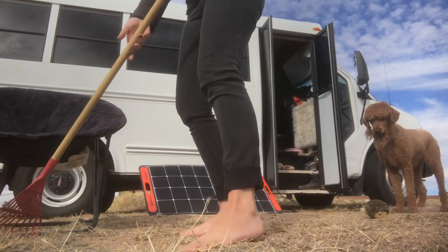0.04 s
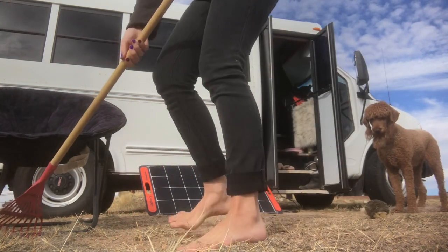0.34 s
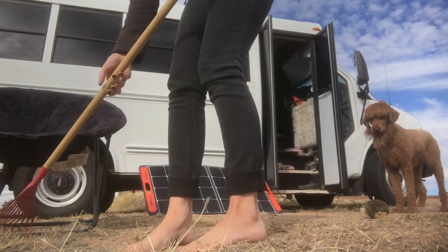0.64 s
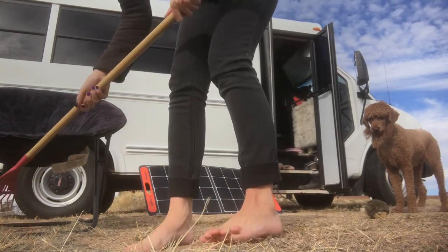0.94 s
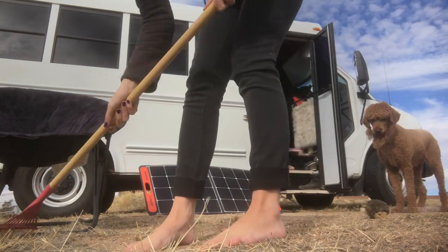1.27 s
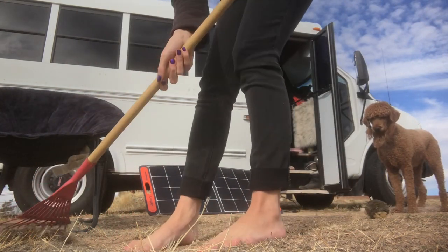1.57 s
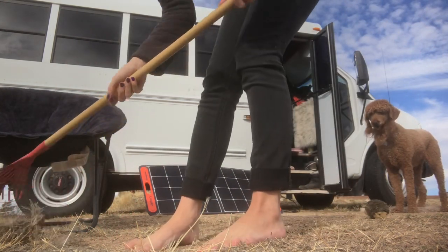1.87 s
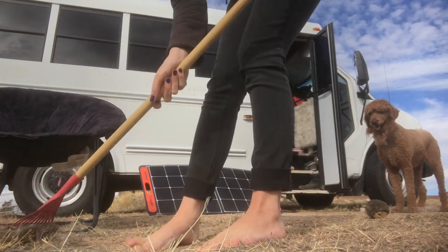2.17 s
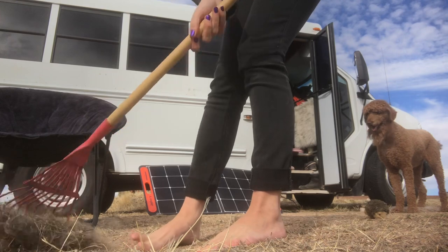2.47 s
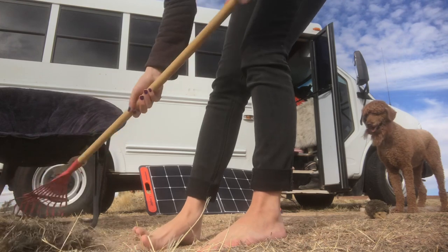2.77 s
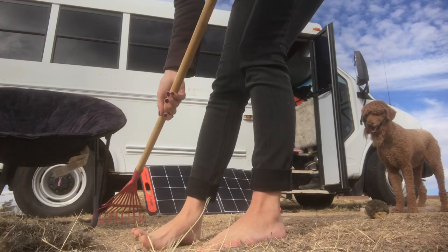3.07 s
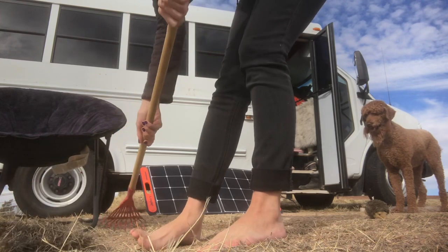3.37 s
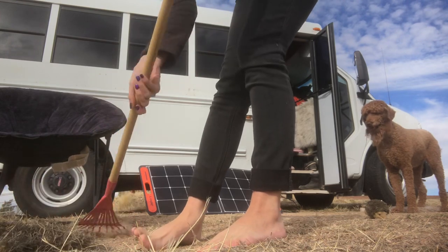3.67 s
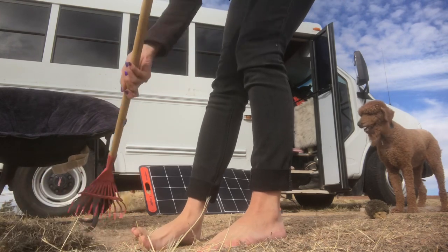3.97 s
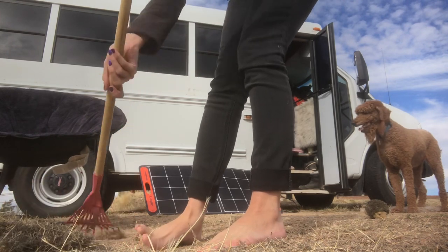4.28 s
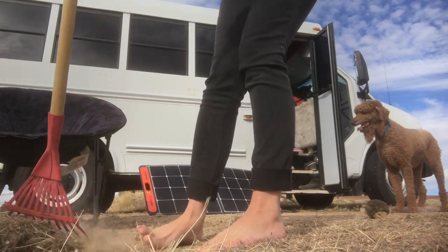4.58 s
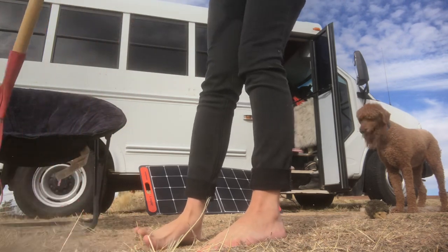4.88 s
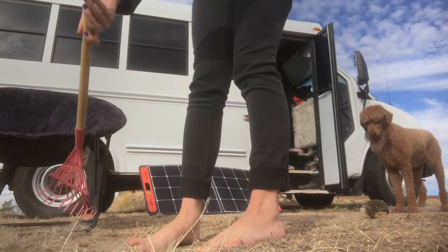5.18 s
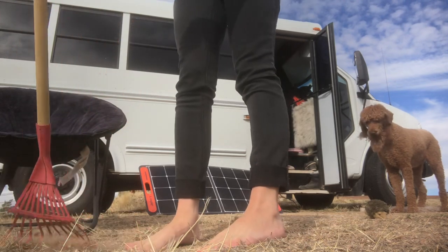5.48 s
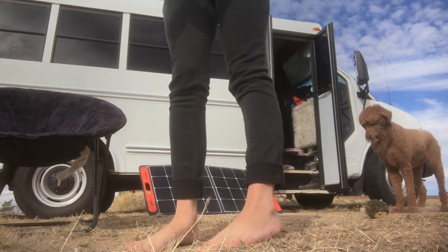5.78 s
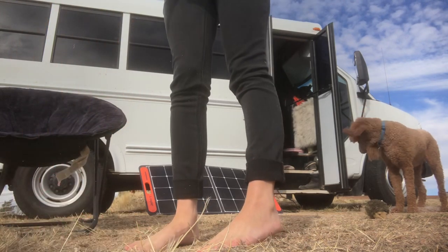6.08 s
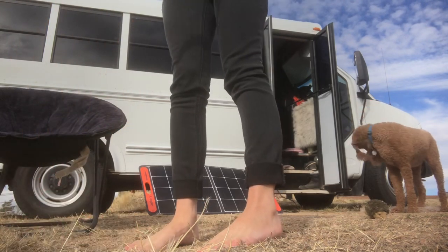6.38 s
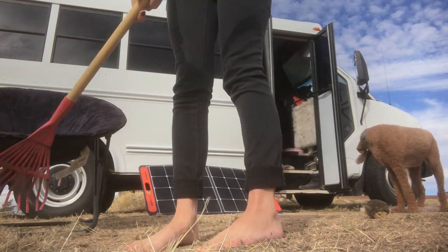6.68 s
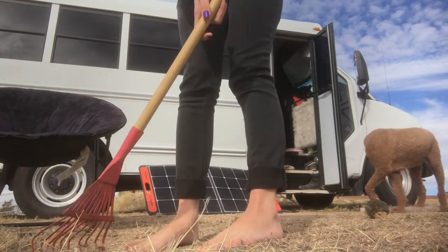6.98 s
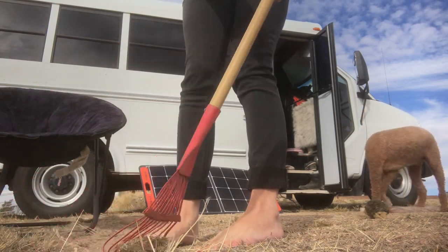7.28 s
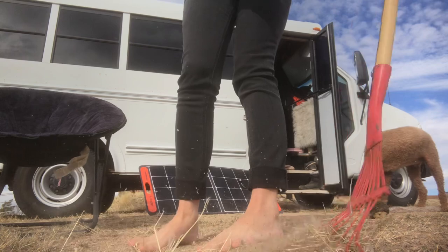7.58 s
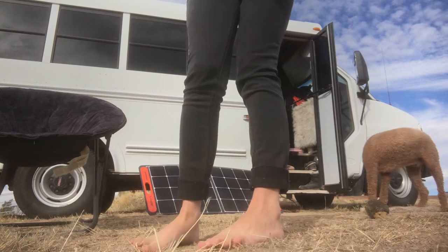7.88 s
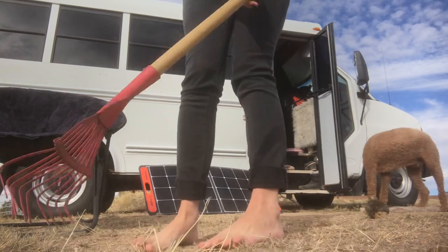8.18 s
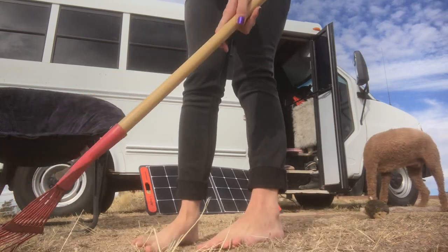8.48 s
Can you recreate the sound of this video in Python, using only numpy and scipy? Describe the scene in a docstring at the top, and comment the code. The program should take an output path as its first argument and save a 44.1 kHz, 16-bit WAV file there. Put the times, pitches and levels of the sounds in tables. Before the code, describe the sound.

Close, uneven strokes of a leaf rake drag through dry straw in a quiet yard, tines flicking and stalks snapping.

```python
"""A small plastic leaf rake, close to the microphone, is pulled again and again through dry grass and
straw in an open yard. Its tines catch, slip and spring free, stalks crackle and snap, and the fan rings
briefly. It works through loose straw, then at the heap, then on short stubble, where one tine judders.
A breeze bumps the low microphone; far off, a dog woofs three times over a faint drone."""
import sys
import numpy as np
from scipy import signal
from scipy.fft import rfft, irfft
from scipy.io import wavfile
from scipy.ndimage import uniform_filter1d

SR = 44100
rng = np.random.default_rng(int(sys.argv[2]) if len(sys.argv) > 2 else 0)


def wrap_up_sound(samples):
    """Save the sound to the file named by the first command line argument, as 16-bit audio."""
    columns = np.atleast_2d(samples).T
    # keep every value between -1 and 1, then stretch to whole-number steps
    tamed = np.clip(columns, -1, 1)
    steps = np.round(tamed * 32767).astype(np.int16)
    wavfile.write(sys.argv[1], SR, steps)


N = 381024
TIME = np.arange(N) / SR
SHORT_TIME = TIME[:SR // 4]
FREQS = np.maximum(np.fft.rfftfreq(N, 1 / SR), 1)
FIRM_PULL_DB = -43   # scrape level of a firm pull; force_db is counted from here


def from_db(db):
    """Decibels to gain."""
    return 10 ** (np.asarray(db) / 20)


def rms_one(x):
    """Scale to unit power."""
    return x / np.sqrt(np.mean(x ** 2) + 1e-20)


def drift(per_s):
    """A random wander of unit power with about per_s turns a second."""
    return rms_one(np.interp(TIME * per_s, np.arange(4096), rng.standard_normal(4096)))


def hump(middle_s, half_s):
    """Gain of a smooth rise and fall."""
    return np.exp(-np.minimum(((TIME - middle_s) / half_s) ** 2, 40))


def dying(t60):
    """A quarter second of decay, falling 60 dB in t60 seconds."""
    return from_db(-60 * SHORT_TIME / t60)


def band(x, low_hz, high_hz, order=3):
    """Causal band-pass."""
    return signal.sosfilt(signal.butter(order, [low_hz, high_hz], "band", fs=SR, output="sos"), x + 1e-18)


def colour(x, spectrum, resonances=()):
    """Minimum-phase filter: a smooth spectrum with resonances standing on it."""
    hz, db = np.transpose(spectrum)
    shape_db = np.interp(np.log(FREQS), np.log(hz), db)
    for centre, width, lift in resonances:
        shape_db = shape_db + lift / (1 + (2 * (FREQS - centre) / width) ** 2)
    cepstrum = irfft(np.log(from_db(shape_db)), N)
    cepstrum[1:N // 2] *= 2
    cepstrum[N // 2 + 1:] = 0
    return irfft(rfft(x) * np.exp(rfft(cepstrum)), N)


def add(out, start, sound):
    """Mix a short sound in at start seconds."""
    at = round(start * SR)
    out[at:at + len(sound)] += sound[:max(N - at, 0)]


def clicks_at(per_s, spread_db):
    """Random clicks of uneven size, with the same power at any rate."""
    at = np.flatnonzero(rng.random(N) < per_s / SR)
    out = np.zeros(N)
    out[at] = from_db(spread_db * np.minimum(rng.exponential(1, N)[at], 4))
    out[at] *= np.sign(rng.random(N)[at] - .5)
    return out / np.sqrt(per_s)


def ring(clicks, hz, t60):
    """Each click sets a dying sine ringing."""
    radius, angle = from_db(-60 / (t60 * SR)), 2 * np.pi * hz / SR
    return signal.lfilter([0, np.sin(angle)], [1, -2 * radius * np.cos(angle), radius ** 2], clicks + 1e-18)


# Wind on the microphone. Each row: frequency in Hz, spectrum level in dB.
WIND_SPECTRUM = [(12, -46), (20, -20.5), (49, 4), (107, -3), (135, -3.5), (248, -16.5), (375, -40.5),
                 (409, -44), (513, -16.5), (600, -27), (780, -65), (1320, -120)]
# Gusts. Each row: middle in seconds, half length in seconds, level in dB.
WIND_GUSTS = [(0.35, 0.45, -56.5), (1.25, .2, -60), (2.15, 0.21, -59), (3.1, .42, -56), (7.2, 0.18, -61.5),
              (8.6, 0.092, -63)]

def breeze(lull_db=-63.5, lumps_db=2.6):
    """Lumpy wind rumbles on the microphone, low over the ground."""
    blowing = from_db(lull_db) + sum(from_db(db) * hump(middle, half) for middle, half, db in WIND_GUSTS)
    lumps = from_db(lumps_db * drift(22))
    wind = colour(rng.standard_normal(N), WIND_SPECTRUM)
    return blowing * rms_one(band(wind, 41, 386) * lumps)


# The open air. Each row: frequency in Hz, spectrum level in dB.
AIR_SPECTRUM = [(15, -28.5), (25, -11.5), (53, -6.5), (80, -11), (130, -10.5), (575, -22), (641, -22.5),
                (796, -26.5), (2410, -31.5), (3250, -35), (6210, -36.5), (14000, -45.5), (16000, -64)]

def yard(drone_db=-64.5, air_db=-71.5):
    """A low drone in the distance and faint, even air all round."""
    drone = rms_one(band(rng.standard_normal(N), 66.5, 87, order=2))
    air = colour(rng.standard_normal(N), AIR_SPECTRUM)
    air /= np.std(band(air, 300, 15000))
    return from_db(drone_db) * drone + from_db(air_db) * air


def thud(db, hz, t60, swell_t60=.0099):
    """A low tone that swells and dies."""
    return from_db(db) * np.sin(2 * np.pi * hz * SHORT_TIME) * dying(t60) * (1 - dying(swell_t60))


# Steps, gusts and dull knocks of the rake as it lands. Each row: start in seconds, level in dB, pitch in Hz.
DULL_BUMPS = [(0.018, -37.5, 151), (0.040, -40, 70.6), (0.071, -35, 140), (0.251, -37.5, 180),
              (0.272, -42, 67), (0.466, -30, 197), (0.491, -42, 92), (0.658, -39, 111), (1.05, -40, 100),
              (2.056, -37.5, 132), (2.503, -38, 75), (2.543, -42.5, 183), (2.698, -34, 149),
              (2.753, -37.5, 70), (3.249, -42, 84.4), (3.38, -37, 90), (4.649, -42, 65),
              (8.141, -43.5, 114)]

def bumps(cycles=7.2):
    """Steps, gusts and the landing rake reach the microphone as soft pushes, a few low cycles each."""
    out = np.zeros(N)
    for start, db, hz in DULL_BUMPS:
        add(out, start, thud(db, hz, t60=cycles / hz))
    return out


def grains(clicks, t60, sharp, turns_db=5, count=5):
    """Several tines or stalks take the load in turn, and each rattles in its own way."""
    shares = np.array([from_db(turns_db * drift(18)) for _ in range(count)])
    shares /= np.sqrt(np.mean(shares ** 2, axis=0))
    owner = rng.integers(0, count, N)
    out = sharp * clicks
    for k, share in enumerate(shares):
        rattle = rng.standard_normal(len(SHORT_TIME)) * dying(t60)
        rattle = rattle[:SR // 16] / np.linalg.norm(rattle)
        out += signal.oaconvolve(clicks * share * (owner == k), rattle)[:N]
    return out


def pings(per_s, low_hz, high_hz, cycles, spread_db):
    """Plucked stalks and tine tips, each at its own pitch, fall 60 dB over the given cycles."""
    out, t = np.zeros(N), TIME[:SR // 16]
    for when, pitch, size in rng.random((int(per_s * TIME[-1]), 3)):
        hz = low_hz * (high_hz / low_hz) ** pitch
        ping = np.sin(2 * np.pi * hz * t) * from_db(-60 * t * hz / cycles)
        add(out, when * TIME[-1], from_db(spread_db * size) * ping)
    return rms_one(out)


def contacts(force_db):
    """Tines stick and slip and crush straw; a harder pull makes more slips and plucks the tines harder."""
    effort = from_db(.25 * np.maximum(force_db, -20))
    slips = rms_one(grains(clicks_at(1600 * effort, spread_db=2), t60=.035, sharp=.51))
    crackle = rms_one(grains(clicks_at(900 * effort, spread_db=2), t60=.044, sharp=.45))
    splinters = grains(clicks_at(110 * effort, spread_db=3.5), t60=.0099, sharp=.63, turns_db=.5, count=2)
    splinters = rms_one(band(splinters, 5100, 19000, order=1))
    tine_rings = effort * pings(per_s=150, low_hz=1099.6, high_hz=3422, cycles=113, spread_db=11.5)
    stalk_rings = pings(per_s=380, low_hz=3300, high_hz=14000, cycles=330, spread_db=16)
    tines = slips + from_db(-14) * tine_rings
    straw = crackle + .86 * slips + from_db(-7) * stalk_rings + from_db(-6) * splinters
    tufts = from_db(.9 * drift(38))   # the whole fan jerks over tufts
    return tufts * np.array([tines, straw])


def band_gains(scrape_db, rumble_db, straw_db):
    """A column of gains for rumble, scrape and straw; rumble and straw are relative to the scrape."""
    return from_db([[scrape_db + rumble_db], [scrape_db], [scrape_db + straw_db]])


# Rustles. Each row: ground, middle and half length in seconds, scrape in dB, straw over scrape in dB.
STRAW_RUSTLES = [("loose", 0.07, .04, -73, -7), ("loose", 0.263, .025, -72, -4),
                 ("loose", 0.523, 0.12, -68.5, -5.5), ("loose", 1.028, 0.027, -64, -4.5),
                 ("loose", 1.745, .02, -70, 0), ("loose", 2.52, .06, -65.5, -9),
                 ("heap", 3.36, 0.013, -67, -12), ("heap", 3.87, 0.084, -66.5, -1),
                 ("heap", 4.02, 0.13, -66.5, -4), ("heap", 4.555, .03, -52, 4),
                 ("heap", 4.78, 0.099, -70, -7), ("heap", 4.945, 0.07, -61.5, -5.5),
                 ("stubble", 5.27, .035, -73, -10), ("stubble", 5.885, .015, -54, 0),
                 ("stubble", 6.07, 0.11, -70, 0), ("stubble", 6.325, 0.062, -70.5, 2),
                 ("stubble", 7.11, .03, -58, 2), ("stubble", 7.69, .035, -59, 4.7),
                 ("stubble", 7.78, 0.12, -69.5, 4.5), ("stubble", 7.95, 0.086, -65.5, -6.5)]

def rustle_power(ground, rumble_db=-6.5):
    """Lifted straw shifts and settles: power in the three bands."""
    return sum((band_gains(db, rumble_db, straw_db) * hump(middle, half)) ** 2
               for on, middle, half, db, straw_db in STRAW_RUSTLES if on == ground)


# Modes of the unloaded fan. Each row: frequency in Hz, level in dB, t60 in seconds.
FAN_MODES = [(1420, 0, .04), (1915, 1, .035), (2900, 2, .03), (3470, 1, .035), (4060, 0, .03),
             (4700, -5, .035), (5550, -2, .025), (7120, -5, .03)]

def free_fan(force_db, relative_db=-14.5, follows=.68):
    """Straw tickles the tines; the ground damps them, so their ringing stands out at a light touch."""
    song = sum(from_db(db) * ring(clicks_at(150, spread_db=2.5), hz, t60) for hz, db, t60 in FAN_MODES)
    return from_db(FIRM_PULL_DB + relative_db + follows * force_db) * rms_one(song)


# Breaking stalks. Each row: start in seconds, relative level in dB, top of the band in Hz.
STALK_SNAPS = [(0.491, -44.5, 14000), (0.507, -45, 14000), (0.812, -40, 9000), (0.853, -42, 12000),
               (1.6836, -41, 13000), (2.499, -47.5, 13000), (5.982, -39.5, 8940), (6.1737, -40, 7000),
               (6.373, -47, 3000), (6.688, -52, 7000), (7.722, -36, 14800), (7.8534, -37, 10000)]

def snaps(gain_db=7, tail_db=-9, tail_t60=.0087):
    """A dry stalk breaks close by, with one sharp click and a very short splintering tail."""
    out = np.zeros(N)
    for start, db, top_hz in STALK_SNAPS:
        crack = from_db(tail_db) * rng.standard_normal(len(SHORT_TIME)) * dying(tail_t60)
        crack[0] = 1
        tick = band(crack, 400, top_hz, order=1)
        add(out, start, from_db(db + gain_db) * tick / np.linalg.norm(tick))
    return out


# Pulls of the rake. Each row: ground, then start, swell, hold and release t60 in seconds, then scrape
# level, change over the hold, rumble over scrape and straw over scrape in dB.
RAKE_PULLS = [("loose", 0.587, 0.038, .18, .85, -58.5, -2.1, -4.5, -3.5),
              ("loose", 1.125, .10, .07, 0.35, -42, 2.45, -9.5, -4.5),
              ("loose", 1.346, 0.092, 0.081, 0.41, -46.5, -2, -5.5, -1.6),
              ("loose", 2.089, 0.058, 0.088, 0.48, -39.7, -2, -5.5, -4),
              ("heap", 3.385, .125, .275, .12, -40.5, -2, -10.5, -5.5),
              ("heap", 4.1496, 0.14, .19, 0.58, -39, 1.34, -9, -4),
              ("stubble", 5.295, 0.083, .21, 0.38, -42.3, -2.8, -7, -4),
              ("stubble", 5.62, 0.052, 0.16, 0.7, -46, -3.5, -4.5, -3),
              ("stubble", 6.915, 0.051, .025, .15, -51, 0, -3.5, -3),
              ("stubble", 7.05, .16, .09, .26, -45.8, -1.1, -3.5, -2),
              ("stubble", 7.295, 0.094, .135, .33, -48.8, 1.6, 1.8, -3),
              ("stubble", 7.555, .05, .025, 0.41, -50.5, 0, 1.6, -2),
              ("stubble", 8.415, 0.049, .175, .4, -47.5, 5.1, -1.7, -4)]

def pull_power(ground, swell_curve=1.12, rumble_follows=.82):
    """The tines dig in, drag at a nearly even force and lift out: power in the three bands."""
    power = np.zeros((3, N))
    for on, start, swell, hold, t60, db, change_db, rumble_db, straw_db in RAKE_PULLS:
        if on == ground:
            t = TIME - start
            dug_in = np.clip(t / swell, 0, 1) ** swell_curve
            held = np.clip((t - swell) / hold, 0, 1)
            released = np.clip((t - swell - hold) / t60, 0, 3)
            gain = dug_in * from_db(change_db * held - 60 * released)
            power += (band_gains(db, rumble_db, straw_db) * [gain ** rumble_follows, gain, gain]) ** 2
    return power


# Landings of the fan. Each row: ground, start in seconds, scrape level in dB, t60 in seconds.
FAN_LANDINGS = [("loose", 0.598, -56, 0.22), ("loose", 1.062, -46.5, 0.48), ("loose", 1.998, -52, .4),
                ("loose", 2.022, -47.5, 0.58), ("heap", 3.37, -55, .5), ("heap", 4.092, -46.5, 0.48),
                ("stubble", 5.302, -47, .5), ("stubble", 6.912, -56, .5), ("stubble", 7.066, -60, .6),
                ("stubble", 8.418, -56, 0.54)]

def landing_power(ground, attack_s=.007):
    """The fan lands and beds into the straw: power in the three bands."""
    power = np.zeros((3, N))
    for on, start, db, t60 in FAN_LANDINGS:
        if on == ground:
            t = TIME - start
            gain = np.clip(t / attack_s, 0, 1) * from_db(-60 * np.clip(t / t60, 0, 2))
            power += (band_gains(db, rumble_db=-7.5, straw_db=-2.5) * gain) ** 2
    return power


# The scrape in loose straw, at the heap and on stubble. Each row: frequency in Hz, spectrum level in dB.
LOOSE_SPECTRUM = [(120, -44), (200, -5.5), (278, -0.5), (612, -0.5), (763, -17.5), (867, -13), (1000, -8.5),
                  (1210, -11), (2330, -1.5), (3760, -9.5), (4680, -5), (5840, -16.5), (7010, -21),
                  (12600, -16), (16000, -25)]
HEAP_SPECTRUM = [(100, 0), (170, 1.5), (279, 7.5), (631, 5.5), (996, -5.5), (1210, -8), (1400, -2),
                 (2530, 3), (3700, -5), (4650, -6), (5950, -9.5), (7060, -8.5), (8380, -15), (12700, -14.5),
                 (16000, -19)]
STUBBLE_SPECTRUM = [(100, -57), (170, -13.5), (279, -0.5), (331, -2.5), (532, -1.5), (1180, -4.5),
                    (1490, -0.5), (1760, -3.5), (2580, -1), (3360, -10.5), (5520, -9.5), (7340, -17.5),
                    (8540, -18), (11800, -13.5), (16000, -19)]
# Fan resonances, which shift with the bend of the tines. Each row: centre and width in Hz, lift in dB.
LOOSE_RESONANCES = [(770, 104, 19), (1046, 45, 2.5), (1410, 94, 2), (1893, 85, 3), (2350, 290, 0.5),
                    (3550, 150, 5), (4050, 62, 3), (4650, 120, -3), (7160, 1600, 10.5)]
HEAP_RESONANCES = [(480, 90, 4.9), (730, 100, 7.1), (1042, 220, 8.9), (1385, 114, 7.6), (2520, 640, 2),
                   (4170, 98, 3.7), (4750, 220, 3.1), (7070, 570, 2.4), (7700, 470, 5.5)]
STUBBLE_RESONANCES = [(281, 41, 2.3), (530, 66, 4.3), (1576, 160, 3.1), (2070, 460, 3.9), (2500, 140, 1.7),
                      (4620, 650, 4), (5420, 190, 3), (7200, 1500, 6.6), (12000, 590, 4)]

def raking(contact, gains):
    """The contacts sound through each ground and the fan: low rumble, tine scrape, straw on top."""
    out = np.zeros(N)
    for ground, spectrum, resonances in [("loose", LOOSE_SPECTRUM, LOOSE_RESONANCES),
                                         ("heap", HEAP_SPECTRUM, HEAP_RESONANCES),
                                         ("stubble", STUBBLE_SPECTRUM, STUBBLE_RESONANCES)]:
        slips, crackle = colour(contact, spectrum, resonances)
        rumble = rms_one(band(slips, 177, 785))
        scrape = rms_one(band(slips, 845, 3220, order=5))
        straw = rms_one(band(crackle, 3300, 19600, order=5))
        out += np.sum(gains[ground] * [rumble, scrape, straw], axis=0)
    return out


# Tines springing free. Each row: start in seconds, level in dB, treble trim in dB, the tine's note in Hz,
# note trim in dB.
TINE_FLICKS = [(0.606, -38.5, -1, 4050, 1), (0.6295, -33, 4.5, 4050, 0), (0.668, -42, 8, 7200, 1),
               (0.738, -47, 3, 2900, -3), (0.7745, -44.5, -2, 2450, 2.5), (1.0635, -28.5, 7, 5150, -10),
               (1.2222, -28, 7, 3960, -3.5), (1.5087, -29.5, 0, 7200, -19), (1.5449, -35.5, -2, 2980, 0),
               (2.064, -31.5, -12, 2400, -2.5), (2.143, -30, 0, 2240, -12), (2.2734, -30.5, -1, 3550, -10),
               (3.3783, -40, -6, 3300, -4), (3.4479, -34.5, -18, 1470, -5), (3.5002, -29, -6, 2690, 2),
               (3.6034, -32, -2, 1900, -10), (4.0962, -35.5, -7, 2400, -7), (4.448, -31, -1, 2180, -2),
               (4.459, -27.5, 4, 7050, 1.5), (5.3084, -34, -4, 4060, -10), (5.33, -39, -11, 3920, 6),
               (5.4955, -36, 8, 2530, -5), (5.5363, -35, 12, 2550, -5), (5.5835, -36, -7, 2540, 2),
               (5.9348, -32, 3, 2510, -10.5), (6.916, -45, 11.5, 2820, 1.5), (6.9664, -36, -11, 1496, -3),
               (7.669, -34, -1, 4650, -15), (8.5986, -28, 7.5, 2484, 5.5)]

def flicks(attack_t60=.004, chatter_s=.0022, rattle_t60=.044, note_t60=.038):
    """A freed tine chatters briefly; its own note and the modes of the fan die away with the rattle."""
    out, t = np.zeros(N), SHORT_TIME
    attack = 1 - dying(attack_t60)
    fade = from_db(-60 * np.maximum(t - chatter_s, 0) / rattle_t60)
    for start, level_db, treble_db, note_hz, note_db in TINE_FLICKS:
        noise = rng.standard_normal((2, len(t)))
        rattle = rms_one(band(noise[0], 720, 5300, order=2)) * fade
        crack = rms_one(band(noise[1], 4400, 15800, order=1)) * fade ** 1.27   # treble dies first
        note = np.sin(2 * np.pi * note_hz * t) * dying(note_t60)
        fan = np.zeros(len(t))
        for hz, db, t60 in FAN_MODES:
            strength = from_db(db) * rng.uniform(.5, 1.5)
            fan += strength * np.sin(2 * np.pi * (hz * t + rng.random())) * dying(2 * t60)
        chatter = from_db(-12) * rattle + from_db(treble_db - 15) * crack
        ringing = from_db(note_db - 3) * note + from_db(-19) * fan
        add(out, start, from_db(level_db) * (chatter + ringing) * attack)
    return out


# Knocks of the rake head. Each row: start in seconds, level in dB, pitch in Hz, t60 in seconds.
HEAD_KNOCKS = [(1.068, -42, 390.5, .36), (1.068, -47, 480, .1), (4.097, -42, 332, 0.045),
               (7.598, -31, 270, .07)]

def knocks():
    """The rake head knocks on the ground near the microphone."""
    out = np.zeros(N)
    for start, db, hz, t60 in HEAD_KNOCKS:
        add(out, start, thud(db, hz, t60))
    return out


# The dog, far off. Each row: start and length in seconds, pitch in Hz, level in dB.
DOG_WOOFS = [(2.705, 0.13, 530, -64), (3.033, 0.13, 546, -66), (3.289, 0.063, 519, -65.5)]

def far_dog(roughness=.052, hoarse_db=-2):
    """Distance leaves little of each woof but an arching fundamental in a hoarse band."""
    out, waver = np.zeros(N), drift(160)
    hoarse = from_db(hoarse_db) * rms_one(band(rng.standard_normal(N), 430, 740, order=2))
    for start, length, hz, db in DOG_WOOFS:
        arch = np.sin(np.pi * np.clip((TIME - start) / length, 0, 1))
        pitch_hz = hz * (.92 + .099 * arch + roughness * waver)
        voice = np.sin(2 * np.pi * np.cumsum(pitch_hz) / SR)
        out += from_db(db) * np.sqrt(np.abs(arch)) * (voice + hoarse)
    return out


# Close modes of one tine. Each row: frequency in Hz, level in dB, t60 in seconds.
TINE_MODES = [(2564, 2, 0.055), (2632, 3, .05), (2690, -8, .05)]

def judder(force_db, start_s=5.31, end_s=5.96, relative_db=1, follows=1.2, fade_db_per_s=8):
    """Quick slips on hard ground keep one tine singing, louder the harder the pull."""
    slips = clicks_at(500, spread_db=2.5)
    song = sum(from_db(db) * ring(slips, hz, t60) for hz, db, t60 in TINE_MODES)
    caught = uniform_filter1d(1.0 * ((TIME > start_s) & (TIME < end_s)), size=1000)
    damping_db = fade_db_per_s * np.maximum(TIME - start_s, 0)   # straw packs in and damps the tine
    return caught * from_db(FIRM_PULL_DB + relative_db + follows * force_db - damping_db) * rms_one(song)


def scene():
    """One low microphone, with the rake working close by and the quiet yard behind."""
    gains = {ground: np.sqrt(rustle_power(ground) + pull_power(ground) + landing_power(ground))
             for ground in ("loose", "heap", "stubble")}
    scrape_gain = sum(scrape for rumble, scrape, straw in gains.values())
    force_db = 20 * np.log10(scrape_gain + 1e-9) - FIRM_PULL_DB
    rake = raking(contacts(force_db), gains) + judder(force_db) + free_fan(force_db) + flicks() + knocks()
    return (rake + snaps() + bumps() + far_dog() + breeze() + yard())[None]


def record(dry, cutoff_hz=15800):
    """The top of the treble is cut steeply."""
    return signal.sosfilt(signal.ellip(12, .1, 80, cutoff_hz, fs=SR, output="sos"), dry)


dry = scene()
out = record(dry)
wrap_up_sound(out)
```